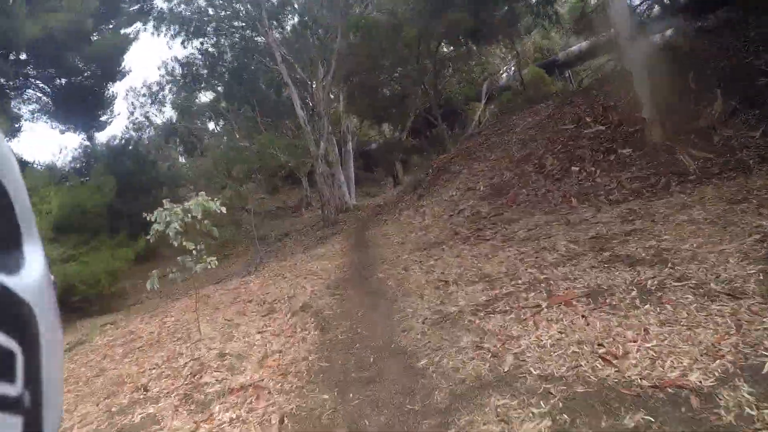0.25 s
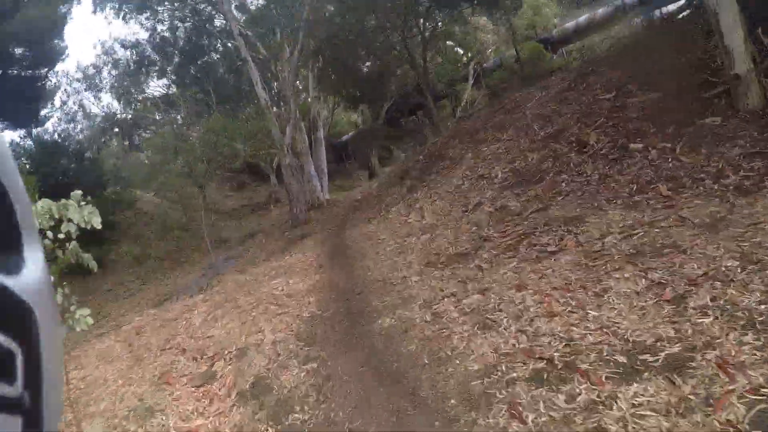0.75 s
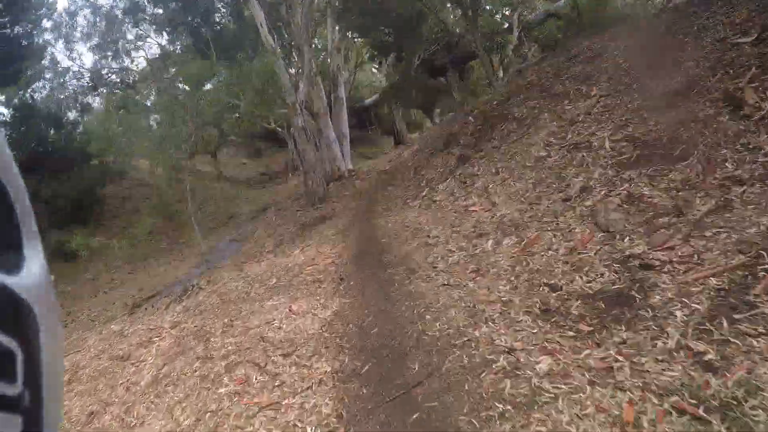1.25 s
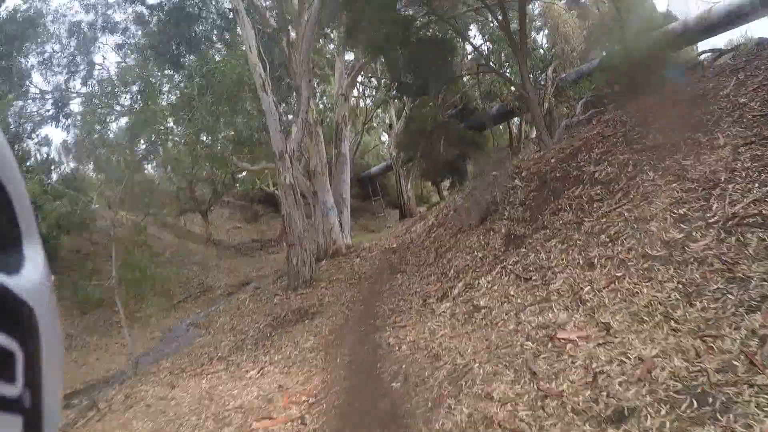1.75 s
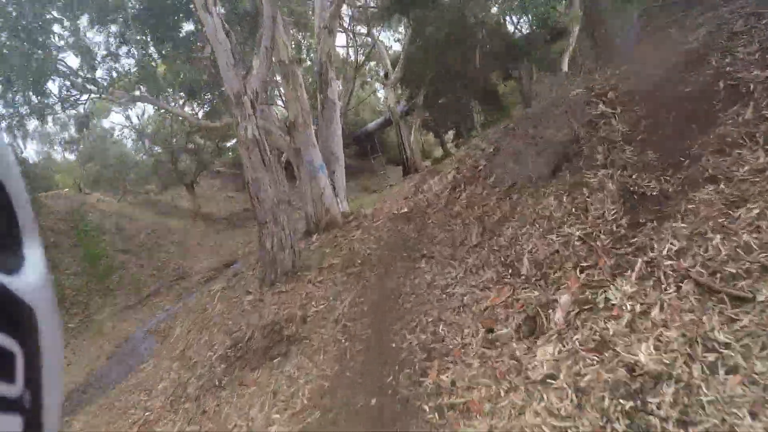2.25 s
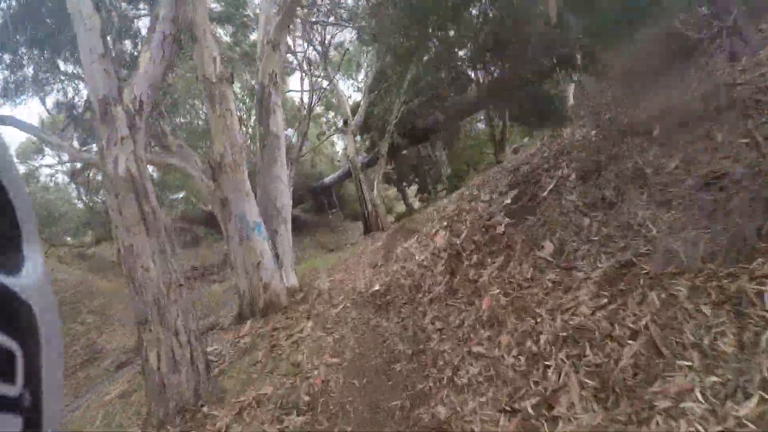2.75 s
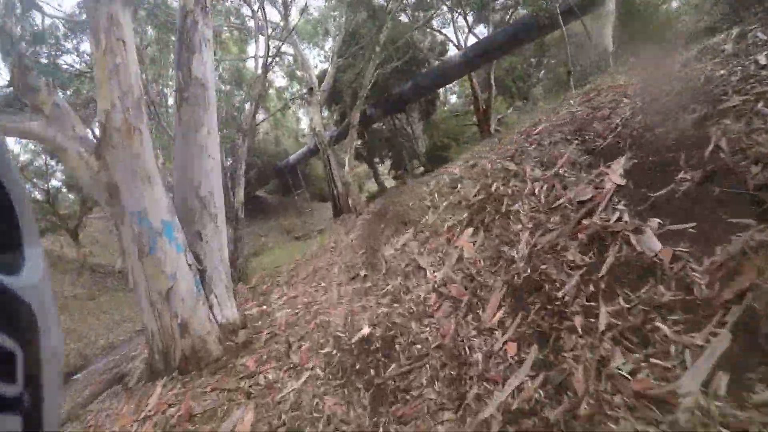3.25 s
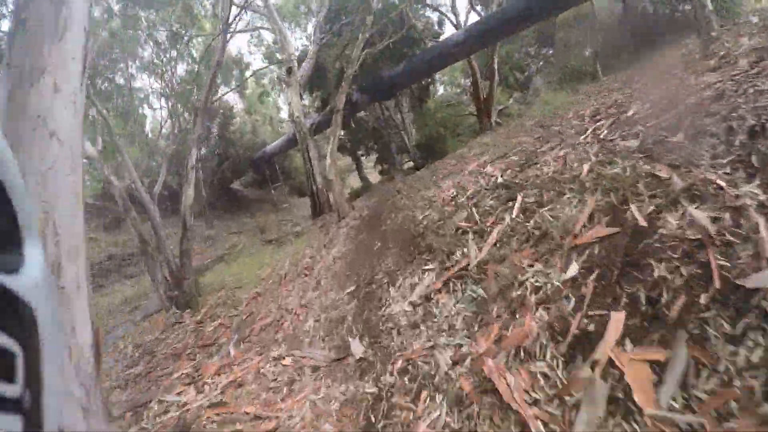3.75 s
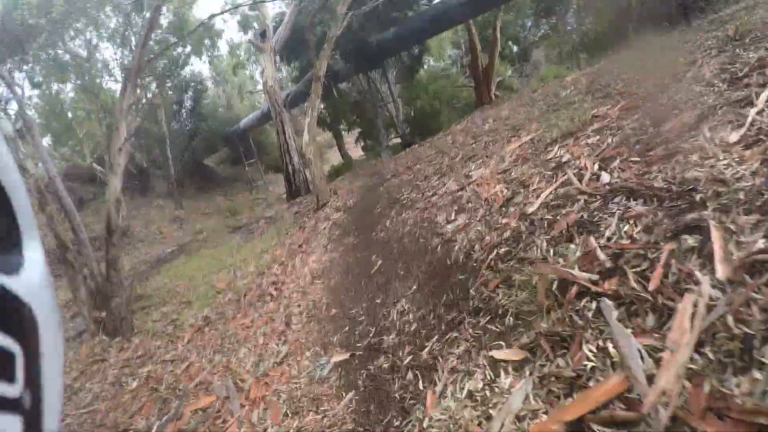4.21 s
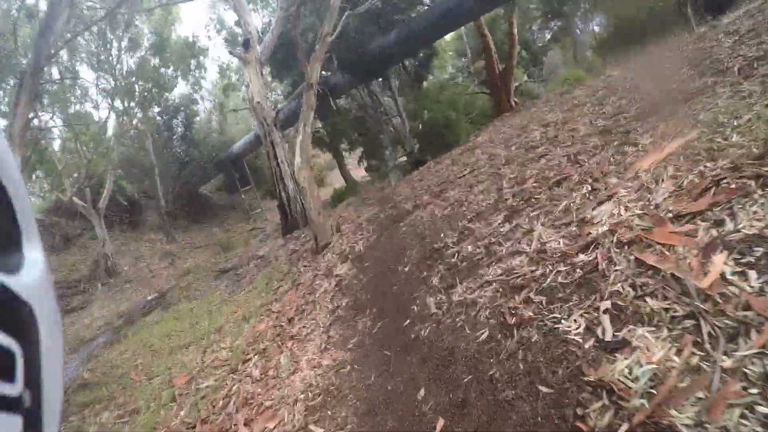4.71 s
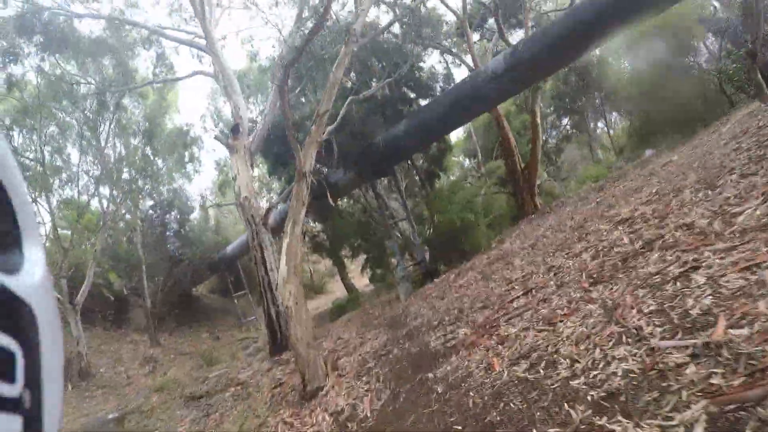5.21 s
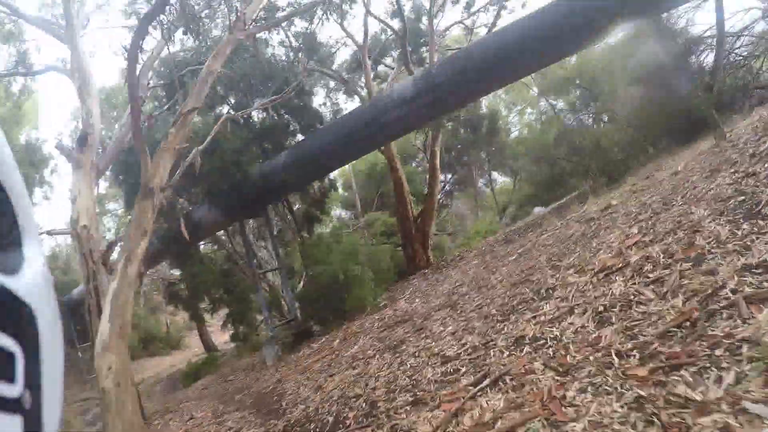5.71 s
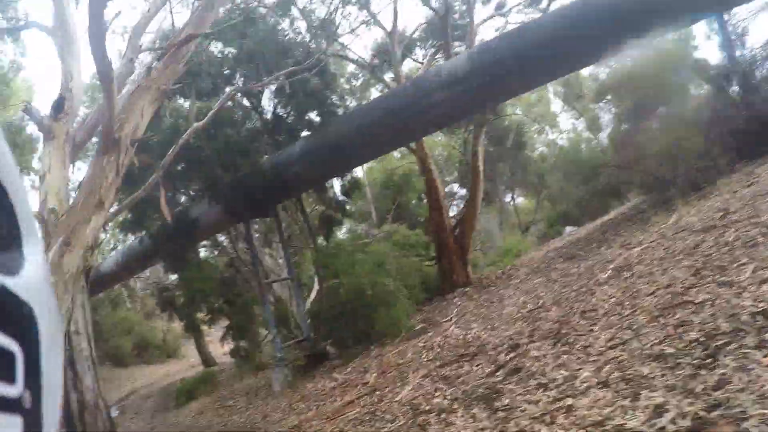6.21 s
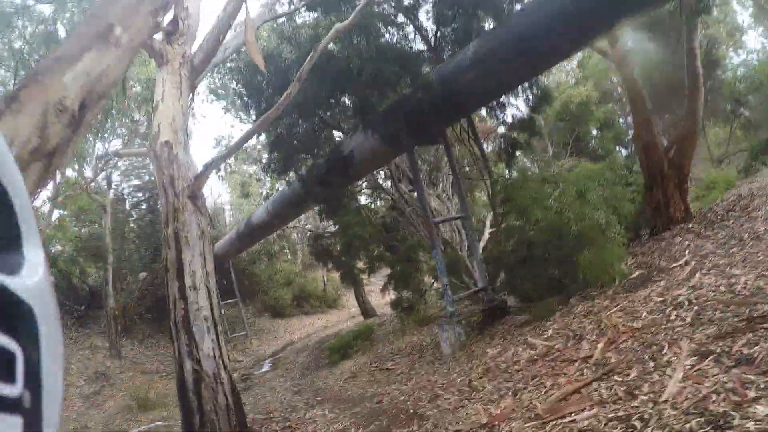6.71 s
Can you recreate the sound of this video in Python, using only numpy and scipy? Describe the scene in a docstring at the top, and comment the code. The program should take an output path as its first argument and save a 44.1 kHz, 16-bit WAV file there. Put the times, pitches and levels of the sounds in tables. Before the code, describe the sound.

A mountain bike rolls along a leafy dirt trail, heard from a microphone riding on it. Low wind buffeting and soft thumps from the shaking mount run throughout, along with thin, dry, electrical-sounding ticks on a beat of about eight a second, uneven and sometimes skipping. The tyres make a grainy hiss with small crunches, swelling from about 1 second and strongest just after 2. A brake sings faintly around 0.2 and 1.8 seconds, and the chain clatters once near 0.7. From 3.5 to about 4.7 seconds the wheels crackle through deep dry leaves, snapping twigs and rattling loose parts over bumps. The hiss dies away by 5 seconds while the wind rumble grows a little stronger. From there to the end, near 7 seconds, small stones plink under the tread and faint distant birds chirp, with one light rattle just after 6.

```python
"""On a dirt trail strewn with dry leaves, a microphone rides on a mountain bike.
Countless grain impacts under the tyres merge into a swelling hiss; leaves and twigs crackle by fracture.
The chain clatters once, bumps rattle loose parts, stones plink and a brake sings faintly by stick-slip.
Wind eddies and the shaking mount rumble underneath. Thin sharp ticks recur on a beat of about eight
a second, and as the hiss dies away faint birds come through."""
import sys
import numpy as np
from scipy import signal
from scipy.fft import rfft, irfft, next_fast_len
from scipy.io import wavfile

SR = 44100
rng = np.random.default_rng(int(sys.argv[2]) if len(sys.argv) > 2 else 0)


def bounce(signal):
    """Save signal as a 16-bit WAV file at the path given by the first command-line argument."""
    frames = np.transpose(np.atleast_2d(signal))
    limited = np.clip(frames, -1, 1)
    pcm = np.round(limited * 32767).astype(np.int16)
    wavfile.write(sys.argv[1], SR, pcm)


N = 306931
TIME = np.arange(N) / SR

# Levels are relative within each table; spectra give level per unit bandwidth.
# tyre hiss over three patches of loose litter, then firm dirt: (time [s], level [dB])
HISS_LEVEL = [(0, -50), (0.8, -49.5), (1.0, -45), (1.195, -45), (1.225, -49), (1.25, -44.5), (1.595, -44),
              (1.635, -49.5), (1.71, -49), (1.93, -51), (2.01, -47), (2.05, -44.5), (2.19, -42.5),
              (2.5, -44), (2.79, -46.5), (2.835, -51.5), (3.17, -49), (3.28, -52.5), (3.43, -46.5),
              (3.6, -49), (4.1, -50.5), (4.35, -54), (4.98, -59), (5.05, -62), (6.96, -64)]
# spectra of loose litter, firm dirt and fine grit: (frequency [Hz], level [dB])
LITTER_SPECTRUM = [(300, -40), (700, -20), (1000, -21.5), (1500, -11), (2200, -3.5), (2950, 0), (3400, -6),
                   (3800, -6.5), (4500, -19.5), (5000, -33.5), (5800, -23), (6600, -51), (8500, -44),
                   (15000, -66)]
DIRT_SPECTRUM = [(300, 0), (600, -6), (1000, -6), (1350, -0.5), (1650, 4), (2150, -6.5), (2550, 6.5),
                 (2950, -5.5), (3500, -10), (4200, -29), (5000, -43), (6000, -18), (8500, -22),
                 (15000, -41)]
GRIT_SPECTRUM = [(2600, 1), (3400, 14), (4100, -1), (4600, -12), (5200, -18), (7000, -21), (9000, -28),
                 (15000, -31)]
# resonances of wheel, drivetrain and microphone case: (frequency [Hz], bandwidth [Hz], level [dB])
WHEEL_MODES = [(1890, 99, -11), (2900, 240, -4)]
DRIVETRAIN_MODES = [(794, 35, -6), (990, 43, -8), (1390, 150, 1.5), (1710, 64, 0.5), (1910, 110, 1),
                    (2570, 180, -0.5), (3210, 230, 2), (3430, 110, 3.5), (3880, 140, 0), (4830, 120, -15),
                    (5660, 440, -12.5), (6700, 340, -20), (6880, 110, -13), (7630, 190, -8.5),
                    (8970, 620, -20.5), (12900, 3800, -31)]
HOUSING_MODES = [(826, 130, 8), (1153, 93, 11), (1849, 175, 8), (3013, 194, 4.5), (5660, 250, 4),
                 (7530, 330, 8.5)]
# bites of the tread into litter: (time [s], level [dB], ring frequency [Hz])
TREAD_BITES = [(0.092, -49, 1860), (0.1448, -40, 3200), (0.171, -40, 1880), (0.2165, -46, 2300),
               (.245, -52, 2100), (0.2755, -41.5, 2920), (0.312, -39.5, 2960), (0.339, -41, 2890),
               (0.412, -46, 2970), (0.452, -41, 2450), (.492, -43, 3050), (0.5435, -46, 2940),
               (0.586, -40, 1940), (0.594, -44, 1950), (0.623, -40, 2900), (0.643, -46, 3140),
               (.742, -45, 2400), (0.771, -45, 2960), (.809, -42, 2900), (0.884, -37.5, 3010),
               (1.238, -37.5, 2620), (1.333, -43, 1980), (1.743, -43, 2450), (1.985, -46, 1880),
               (2.017, -43, 2960), (2.13, -39, 2940), (2.259, -38.5, 3020), (2.3686, -39, 3170),
               (2.541, -43, 2970), (2.652, -45, 2920), (2.667, -37, 3030), (2.735, -41, 2800),
               (2.784, -44, 2700), (2.878, -41, 1900), (2.93, -49, 2920), (2.952, -45, 2800),
               (3.117, -48, 3010), (3.135, -41.5, 3000), (3.172, -48, 1840), (3.303, -43.5, 3010),
               (3.4, -43, 2910), (3.442, -38, 3250), (3.459, -38, 3420)]
# crackle through one deep drift of leaves: (time [s], level [dB])
CRACKLE_LEVEL = [(2.7, -72), (3.515, -69), (3.55, -57), (3.62, -60), (3.76, -57), (3.85, -65), (4.02, -62),
                 (4.14, -60.5), (4.18, -64), (4.225, -55), (4.3, -60), (4.41, -61), (4.55, -64),
                 (4.64, -63), (4.71, -59), (4.77, -64), (4.9, -66), (5.5, -69.5), (6.96, -69.5)]
# breaks of twigs and bark: (time [s], level [dB], ring frequency [Hz])
TWIG_SNAPS = [(0.047, -47, 7600), (0.0813, -52, 7300), (0.1442, -44, 6470), (1.123, -39.5, 7300),
              (1.1703, -52, 7500), (1.33, -53, 7000), (1.977, -47, 7200), (2.0848, -50, 7000),
              (2.979, -50, 6900), (3.4125, -46, 5800), (3.426, -48, 7400), (3.534, -47, 5800),
              (3.542, -33, 5560), (3.5585, -42, 7400), (3.5665, -44, 5800), (3.573, -34, 3700),
              (3.579, -46, 7250), (3.6585, -43, 5700), (3.666, -39.5, 5960), (3.707, -45, 7300),
              (3.714, -45, 7000), (3.7382, -41, 5600), (3.749, -41, 5800), (3.757, -44, 6000),
              (3.9493, -34.5, 3720), (4.0958, -36, 5600), (4.1281, -33.5, 3000), (4.1362, -34.5, 3500),
              (4.26, -35.5, 6200), (4.271, -45, 7240), (4.2775, -48, 6000), (4.351, -37.5, 6070),
              (4.4977, -41, 6000), (4.5379, -56, 6000), (4.675, -52, 7200), (4.6965, -43, 5670),
              (4.709, -55, 7300)]
# spectra of crumbling leaves and splintering wood: (frequency [Hz], level [dB])
LEAF_SPECTRUM = [(800, -6), (2000, -3), (3500, 14.5), (4900, -3.5), (5900, 5), (6700, 3), (7600, -4),
                 (8500, -8), (10000, -11), (11500, -8.5), (13000, -3), (15500, -23)]
SPLINTER_SPECTRUM = [(1200, -9), (3500, 15), (4800, -6), (5800, 6), (7800, -2), (8800, -18),
                     (11500, -1), (15500, -13)]
# slaps of the chain on the cogs: (time [s], level [dB], decay time [s], treble lift [dB])
CHAIN_SLAPS = [(0.644, -36, 0.035, 0.5), (0.6697, -27.5, 0.013, 3), (0.6797, -39, 0.025, 1.5),
               (0.7184, -30, 0.0038, 10)]
# rattles over bumps: (time [s], level [dB], decay time [s], ring frequency [Hz])
BUMP_RATTLES = [(0.142, -47, 0.0088, 1300), (3.541, -50, 0.019, 1200), (3.57, -60, 0.0084, 1300),
                (3.734, -48.5, 0.015, 1550), (3.751, -46, 0.0048, 1300), (4.261, -44, 0.012, 1200),
                (4.309, -49.5, 0.028, 1000), (4.69, -59, 0.028, 1590), (6.081, -51.5, 0.016, 2200),
                (6.098, -48, 0.012, 2150), (6.213, -55.5, 0.023, 2000)]
# stones under the tread: (time [s], ring frequency [Hz], ring level [dB], crunch level [dB])
PEBBLE_HITS = [(4.536, 1430, -54, -53), (4.696, 3120, -54, -52), (4.79, 1460, -55, -60),
               (4.895, 1890, -51, -59), (4.93, 3130, -58, -52), (5.062, 1590, -51, -58),
               (5.081, 3340, -55, -55), (5.1806, 1650, -58, -53), (5.272, 3740, -53, -52),
               (5.372, 1400, -58, -52), (5.61, 2000, -60, -55), (5.657, 1300, -57, -59),
               (5.731, 1140, -52, -53), (5.767, 3250, -55, -56), (6.015, 2610, -60, -53),
               (6.349, 1170, -57, -51), (6.357, 2820, -56, -53), (6.398, 3550, -57, -56),
               (6.5225, 1530, -53, -56), (6.562, 1510, -56, -55), (6.664, 3330, -69, -52),
               (6.854, 1450, -58, -54), (6.892, 1600, -54, -60)]
# spectra of rattling parts and grinding stones: (frequency [Hz], level [dB])
RATTLE_SPECTRUM = [(300, -10), (750, -14.5), (1200, -7), (1700, -1.5), (2200, -14), (2700, -2), (3400, -23),
                   (4600, -24), (7000, -43), (14000, -38)]
GRAVEL_SPECTRUM = [(600, -10), (1200, -1), (1800, 1), (2200, -6), (3300, 0.5), (3900, -4), (4800, -17),
                   (9000, -30)]
# brake tones: (time [s], duration [s], start pitch [Hz], middle pitch [Hz], end pitch [Hz], level [dB])
BRAKE_TONES = [(0.163, 0.08, 1850, 1850, 1930, -48.5), (0.285, 0.11, 1860, 1910, 1890, -50),
               (1.795, 0.11, 1820, 1850, 1875, -50.5)]
# steady shudder and single hard jolts of the frame: (time [s], level [dB])
SHUDDER_LEVEL = [(0, -38.5), (0.25, -33), (0.4, -47), (0.85, -42.5), (1.75, -36), (2.4, -39.5),
                 (2.85, -37.5), (3.4, -36), (3.6, -44.5), (4.18, -34), (4.92, -41), (5.08, -50),
                 (5.5, -49.5), (5.72, -60), (6.02, -47), (6.15, -41), (6.7, -38.5), (6.96, -57)]
JOLTS = [(0.209, -10.5), (0.595, -14.5), (1.895, -10), (2.111, -17), (2.841, -16), (2.907, -13),
         (4.057, -7), (4.231, -10), (4.263, -7.5), (4.452, -8), (4.569, -21), (4.656, -13), (4.706, -10.5),
         (4.82, -13), (5.229, -17), (5.282, -16), (5.467, -24), (5.83, -17), (6.135, -16.5), (6.303, -8.5),
         (6.355, -12), (6.581, -20), (6.703, -20.5)]
# gusts on the microphone and airflow past the bike: (time [s], level [dB])
GUST_LEVEL = [(0.02, -41.5), (0.2, -31), (0.6, -31.5), (0.85, -40), (1.55, -35), (1.72, -32.5), (2.14, -31),
              (2.28, -39.5), (2.6, -38.5), (2.85, -28), (3.25, -34), (3.6, -29.5), (3.95, -30.5),
              (4.26, -26.5), (4.87, -25.5), (5.02, -31.5), (5.14, -38), (5.25, -27), (5.5, -26),
              (5.69, -29.5), (5.85, -23), (6.01, -34), (6.15, -30.5), (6.96, -35.5)]
AIRFLOW_LEVEL = [(0.1, -53.5), (0.19, -55), (2.64, -53), (5.34, -67.5), (6.02, -62), (6.85, -68)]
# spectra of the springy mount, large and small eddies, and faint air hiss: (frequency [Hz], level [dB])
MOUNT_SPECTRUM = [(30, -20), (42, -3.5), (54, -5.5), (62, -10.5), (72, -25), (90, -37), (130, -42)]
BUFFET_SPECTRUM = [(8, 1.5), (15, 8), (25, -0.5), (38, -14.5), (48, -13.5), (62, -26), (90, -44)]
RUSH_SPECTRUM = [(50, -11), (68, 8), (82, 8), (100, 3), (150, -1), (200, -5), (280, -8.5), (400, -12.5),
                 (650, -16), (1200, -16), (3000, -42)]
AIR_SPECTRUM = [(200, 12), (1000, 0.5), (3000, 0), (5500, -3.5), (7500, -13), (9000, -9), (15000, -15.5)]
# ticks on a beat of about eight a second, some beats silent: (time [s], level [dB])
TICK_BEATS = [(0.0398, -29.5), (0.2901, -35), (0.5404, -27), (0.7907, -39), (1.2496, -30), (1.4999, -42),
              (1.625, -40), (1.8753, -32), (2.1256, -30), (2.2508, -42), (2.3759, -36), (2.501, -34),
              (2.7513, -27), (2.8765, -37), (3.0016, -33), (3.1268, -40), (3.2519, -32), (3.3771, -24),
              (3.5022, -38), (3.6274, -28), (3.7525, -33), (4.0028, -22.5), (4.128, -31), (4.2531, -32),
              (4.3784, -38), (4.4617, -19), (4.5868, -28), (4.712, -41), (4.8371, -16.5), (4.9623, -33),
              (5.0874, -30), (5.2126, -31), (5.3377, -32), (5.4629, -31), (5.7132, -36), (5.8383, -26),
              (5.9635, -32), (6.0886, -33), (6.2138, -30), (6.3389, -34), (6.4641, -32), (6.5892, -32),
              (6.8395, -28)]
# distant bird notes: (time [s], duration [s], start pitch [Hz], middle pitch [Hz], end pitch [Hz],
# flutter [fraction of pitch], level [dB])
BIRD_NOTES = [(2.878, 0.065, 6950, 6860, 6800, .015, -70), (4.837, .05, 4440, 4680, 4950, .012, -64.5),
              (4.895, 0.051, 5600, 5350, 5040, 0.011, -67), (5.53, 0.066, 5100, 5200, 5400, .04, -71),
              (5.555, 0.07, 7100, 6950, 6800, .04, -70), (5.745, .06, 4500, 4650, 4560, 0.014, -69),
              (5.77, .036, 5600, 5770, 5850, .008, -66), (5.774, 0.053, 5150, 5460, 5500, 0.015, -65),
              (5.793, 0.043, 6300, 6950, 6750, .006, -68), (5.916, .035, 5050, 5260, 5600, .01, -71),
              (5.945, 0.022, 5450, 6030, 6950, 0.0058, -62.5), (5.958, 0.044, 7150, 7270, 6850, .006, -65),
              (6.365, 0.049, 4500, 4720, 4850, .015, -70), (6.421, 0.055, 4450, 4640, 4900, 0.0088, -71),
              (6.768, 0.051, 4400, 4500, 4900, .008, -63.5), (6.822, .08, 5450, 5520, 5570, 0.026, -68),
              (6.915, .045, 5370, 5560, 5620, .02, -68)]


def tyres(hiss_db):
    """Granular noise: grains shifting under the tread sum to a hiss, louder on looser ground."""
    looseness = np.clip((hiss_db + 60) / 15, 0, 1)
    tread = from_db(1.2 * drift(55) + 1.38 * drift(200))   # knobs bite unevenly
    sliding = from_db(hiss_db) * np.sqrt(looseness) * tread
    on_litter = from_db(-0.5) * colour(grains(per_s=8000, spread_db=2.5) * sliding, LITTER_SPECTRUM)
    on_dirt = colour(grains(per_s=3000, spread_db=2.5) * tread, DIRT_SPECTRUM)
    dirt_gain = from_db(hiss_db - 2) * np.sqrt(1 - looseness)
    return on_litter + wheel(sliding) + dirt_gain * on_dirt


def wheel(sliding):
    """Forced vibration: coarser grains drive the wheel's modes, each flaring up on its own."""
    ringing = np.zeros(N)
    for hz, width, db in WHEEL_MODES:
        flicker = from_db(db - 1.5 * drift(83))
        ringing += resonate(flicker * sliding * grains(per_s=900, spread_db=0.5), hz, width)
    return ringing


def scuffs():
    """Transient excitation: a knob crushes the litter, and each crunch rings at its own pitch."""
    crushing = grains(per_s=9000, spread_db=-2.5)
    bites = [(from_db(db) * burst(s, fall=0.011, rise=0.00058) * crushing, hz)
             for s, db, hz in TREAD_BITES]
    crunch, ringing = strike(bites, width_hz=220)
    return colour(from_db(-3.5) * crunch + from_db(-1.5) * ringing, LITTER_SPECTRUM)


def grit(hiss_db):
    """Fine impacts: grit sprays off the tread, growing faster than the hiss and so brightening it."""
    level_db = -54.5 + 3.3 * (hiss_db + 45)
    return colour(from_db(level_db) * grains(per_s=8800, spread_db=5), GRIT_SPECTRUM)


def leaves(hiss_db):
    """Brittle fracture: dry leaves crumble in clumps of tiny cracks."""
    stray_leaves = from_db(hiss_db - 26)   # a thin crackle follows the tyre hiss
    strength = np.hypot(from_db(level_curve(CRACKLE_LEVEL)), stray_leaves)
    clumps = from_db(2.5 * drift(150))
    fractures = grains(per_s=2600, spread_db=3.3)
    return colour(fractures * strength * clumps, LEAF_SPECTRUM)


def twigs():
    """Release of strain: fibres tear at once, smaller ones crumble after, and both ring the piece."""
    fibres = grains(per_s=20000, spread_db=0)
    crumbs = from_db(-13.5) * grains(per_s=3000, spread_db=2)
    cracks = []
    for s, db, hz in TWIG_SNAPS:
        tearing = burst(s, fall=0.0014, rise=0.00021) * fibres
        crumbling = burst(s, fall=0.0094, rise=0.0014) * crumbs
        cracks.append((from_db(db) * (tearing + crumbling), hz))
    splinters, ringing = strike(cracks, width_hz=970)
    return from_db(2.5) * ringing + from_db(-2.5) * colour(splinters, SPLINTER_SPECTRUM)


def chain():
    """Modal response: each slap is a shower of link contacts ringing the cogs and frame."""
    links = grains(per_s=20000, spread_db=-2)
    body, edge, ringing = np.zeros((3, N))
    for s, db, fall, treble_db in CHAIN_SLAPS:
        slap = from_db(db) * burst(s, fall, rise=0.00056) * links
        body += slap
        edge += from_db(treble_db) * slap
    for k, (hz, width, db) in enumerate(DRIVETRAIN_MODES):
        force = edge if hz > 4500 else body
        ringing += (-1) ** k * from_db(db + 8.5) * resonate(force, hz, width)   # modes alternate in sign
    bright_tail = echoes(resonate(edge, hz=8900, width_hz=5000), fall=0.076)
    return ringing + from_db(-26) * bright_tail


def bumps():
    """Repeated collision: roots and stones rattle loose parts, one ringing above the rest."""
    contacts = grains(per_s=3300, spread_db=0)
    shakes = [(from_db(db) * burst(s, fall, rise=0.00056) * contacts, hz)
              for s, db, fall, hz in BUMP_RATTLES]
    rattle, ringing = strike(shakes, width_hz=640)
    return from_db(-0.5) * colour(rattle, RATTLE_SPECTRUM) + from_db(4.5) * ringing


def pebbles():
    """Damped free vibration: a stone caught under the tread grinds briefly and rings once."""
    rings, grinding = np.zeros((2, N))
    for s, hz, ring_db, crunch_db in PEBBLE_HITS:
        tone = np.sin(2 * np.pi * hz * (TIME - s))
        rings += from_db(ring_db) * burst(s, fall=0.0069, rise=0.00045) * tone
        grinding += from_db(crunch_db) * burst(s, fall=0.0049, rise=0.0003)
    return rings + colour(grinding * grains(per_s=8600, spread_db=3), GRAVEL_SPECTRUM)


def brake():
    """Stick-slip friction: a pad dragging lightly on its disc gives a hoarse tone and its octave."""
    waver = 1 + 0.026 * drift(600)
    squeal = np.zeros(N)
    for s, length, *pitches, db in BRAKE_TONES:
        swell, phase = glide(s, length, pitches, waver)
        squeal += from_db(db) * swell * (np.sin(phase) + from_db(-4) * np.sin(2 * phase))
    rasp = unit_power(from_db(3.5 * drift(260)))
    return squeal * rasp


def frame():
    """Mass on a spring: the ground shakes the microphone on its mount; a jolt gives a swing or two."""
    swings = np.zeros(N)
    for s, db in JOLTS:
        hz = rng.uniform(26.6, 44.8)
        swings += from_db(db + 7) * burst(s, fall=0.012, rise=0.018) * np.sin(2 * np.pi * hz * (TIME - s))
    cushion = signal.butter(4, 62, fs=SR, output="sos")   # the tyres soften each blow
    thumps = signal.sosfilt(cushion, swings + 1e-18)
    return rumble(MOUNT_SPECTRUM, uneven(SHUDDER_LEVEL, swing_db=1.5, per_s=11)) + thumps


def wind():
    """Turbulence: slow eddies buffet the microphone; smaller ones make a soft rush above them."""
    rush = colour(rng.standard_normal(N), RUSH_SPECTRUM) * from_db(drift(40))
    buffet = rumble(BUFFET_SPECTRUM, uneven(GUST_LEVEL, swing_db=1.5, per_s=16))
    return buffet + from_db(level_curve(AIRFLOW_LEVEL) + 4) * rush


def ticks():
    """An impulse has a flat spectrum and no ring: dry, electrical-sounding ticks of uneven strength."""
    s, db = np.transpose(TICK_BEATS)
    impulses = np.zeros(N)
    impulses[np.round(s * SR).astype(int)] = from_db(db)
    return impulses


def birds():
    """Frequency modulation: slurred whistles, clear or buzzy, scattered by foliage and trunks."""
    tremor = drift(600)
    song = np.zeros(N)
    for s, length, *pitches, flutter, db in BIRD_NOTES:
        swell, phase = glide(s, length, pitches, 1 + flutter * tremor)
        song += from_db(db) * swell * np.sin(phase)
    foliage = from_db(-6) * echoes(song, fall=0.012)
    trunks = from_db(-5) * echoes(song, fall=0.13)
    return from_db(-5) * song + foliage + trunks


def air():
    """Stationary noise: a faint steady hiss."""
    return from_db(-65) * colour(rng.standard_normal(N), AIR_SPECTRUM)


def housing(x):
    """Resonance: the case round the microphone lifts a few narrow bands."""
    return x + sum((from_db(db) - 1) * resonate(x, hz, width) for hz, width, db in HOUSING_MODES)


def echoes(x, fall):
    """Diffuse scattering: a reverberant tail dying with time constant `fall` [s]."""
    tail = rng.standard_normal(SR // 2) * np.exp(-TIME[:SR // 2] / fall)
    return signal.fftconvolve(x, tail / np.linalg.norm(tail))[:N]


def rumble(spectrum, level_db):
    """Amplitude modulation: low noise, held at even strength, follows a level curve."""
    noise = colour(rng.standard_normal(N), spectrum)
    local_power = signal.fftconvolve(noise ** 2, np.hanning(7000), "same")
    return from_db(level_db) * unit_power(noise / np.sqrt(local_power))


def grains(per_s, spread_db):
    """Shot noise: random tiny impacts of unit power; positive spread makes a few large, negative small."""
    sizes = from_db(spread_db * np.minimum(rng.exponential(1, N), 4)) * rng.choice([-1, 1], N)
    return unit_power(sizes * (rng.random(N) < per_s / SR))


def burst(s, fall, rise):
    """Exponential decay: the envelope of a contact at time `s`, with time constants in seconds."""
    live = slice(int(s * SR) + 1, int((s + 16 * fall) * SR))
    age = TIME[live] - s
    envelope = np.zeros(N)
    envelope[live] = (1 - np.exp(-age / rise)) * np.exp(-age / fall)
    return envelope


def glide(s, length, pitches, waver):
    """Phase integrates frequency: the envelope and phase of a short tone passing through the pitches."""
    progress = np.clip((TIME - s) / length, 0, 1)
    hz = np.interp(progress, np.linspace(0, 1, len(pitches)), pitches) * waver
    return np.sqrt(2) * np.sin(np.pi * progress), 2 * np.pi * np.cumsum(hz) / SR


def strike(contacts, width_hz):
    """Excitation and response: the sum of (force, frequency [Hz]) contacts, and the ringing they cause."""
    direct = sum(force for force, hz in contacts)
    ringing = sum(resonate(force, hz, width_hz) for force, hz in contacts)
    return direct, ringing


def resonate(x, hz, width_hz):
    """Damped oscillator: one resonance with unit gain at its peak."""
    radius = np.exp(-np.pi * width_hz / SR)
    zeros = np.array([1, 0, -1]) * (1 - radius ** 2) / 2
    poles = [1, -2 * radius * np.cos(2 * np.pi * hz / SR), radius ** 2]
    return signal.lfilter(zeros, poles, x + 1e-18)


def colour(x, spectrum):
    """Linear filtering: impose a spectrum on x; white noise keeps its power."""
    size = next_fast_len(N + 8192)
    hz, db = np.transpose(spectrum)
    bins = np.fft.rfftfreq(size, 1 / SR) + 1e-3
    octaves_outside = np.maximum(np.log2(bins / hz[-1]), 0) + np.maximum(np.log2(hz[0] / bins), 0)
    gain = from_db(np.interp(np.log(bins), np.log(hz), db) - 24 * octaves_outside)
    return irfft(rfft(x, size) * unit_power(gain), size)[:N]


def uneven(curve, swing_db, per_s):
    """Random modulation: a level curve [dB] with swells and dips on it."""
    return level_curve(curve) + swing_db * drift(per_s)


def drift(per_s):
    """Slow noise: unit spread, changing about `per_s` times a second."""
    steps = rng.standard_normal(N // 16)
    return unit_power(np.interp(TIME * per_s, np.arange(len(steps)), steps))


def level_curve(rows):
    """Linear interpolation of (time [s], level [dB]) points."""
    return np.interp(TIME, *np.transpose(rows))


def unit_power(x):
    """Normalisation to a mean square of one."""
    return x / np.sqrt(np.mean(x ** 2) + 1e-20)


def from_db(db):
    """Amplitude ratio of a level in decibels."""
    return 10 ** (np.asarray(db) / 20)


def scene():
    """Superposition: tyre, litter and bump sounds pass through the housing; the rest add directly."""
    background = air()
    hiss_db = uneven(HISS_LEVEL, swing_db=0.97, per_s=16)   # the ground is patchy
    ground = tyres(hiss_db) + scuffs() + grit(hiss_db) + leaves(hiss_db) + twigs() + bumps()
    bike = from_db(-2) * housing(ground) + chain() + brake() + pebbles() + frame()
    return (bike + birds() + background + wind() + ticks())[None]


def record(dry):
    """Low-pass filtering: the treble is cut steeply above 16 kHz."""
    return signal.sosfilt(signal.ellip(10, 0.1, 80, 16000, fs=SR, output="sos"), dry)


dry = scene()
out = record(dry)
bounce(out)
```